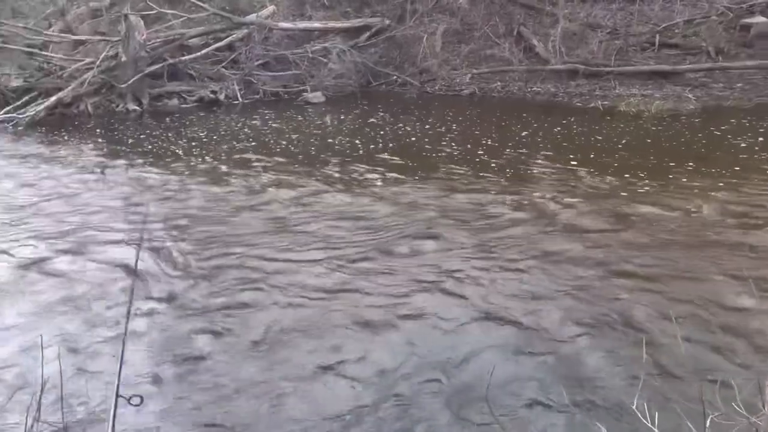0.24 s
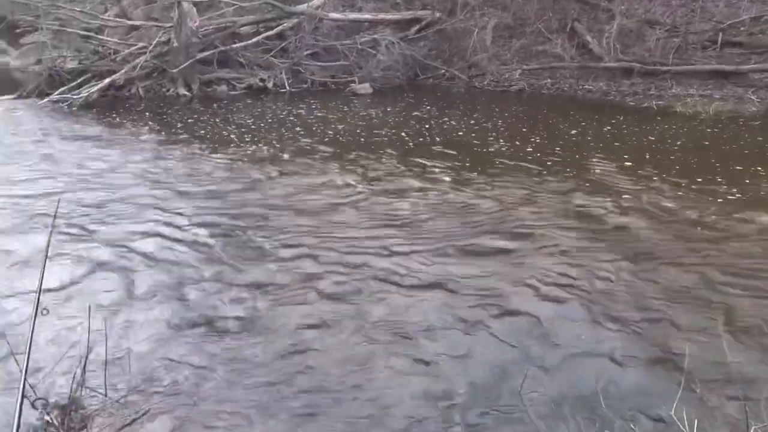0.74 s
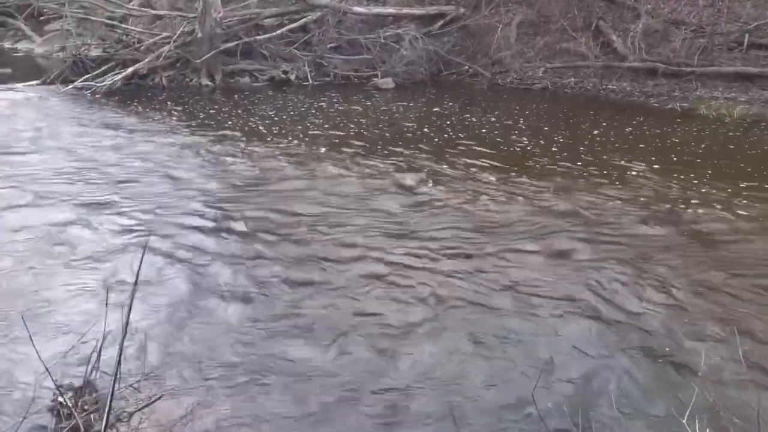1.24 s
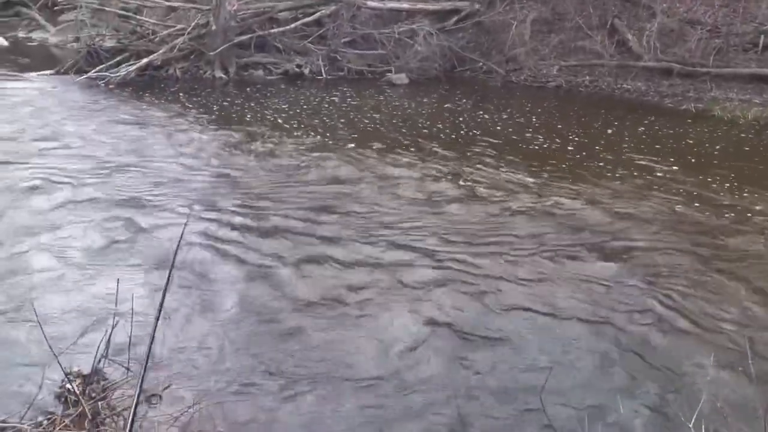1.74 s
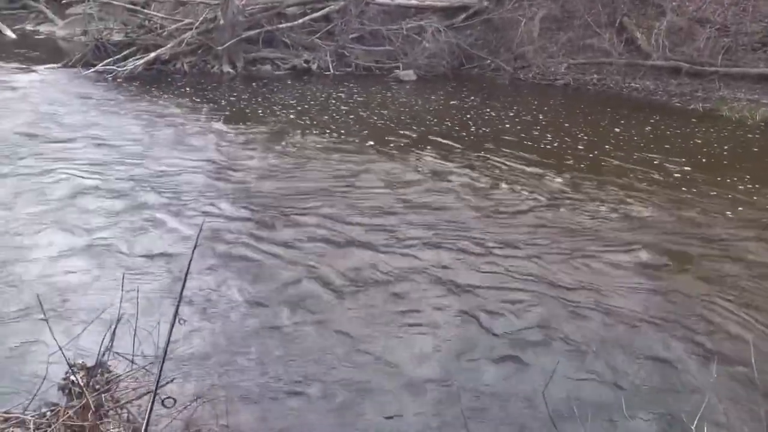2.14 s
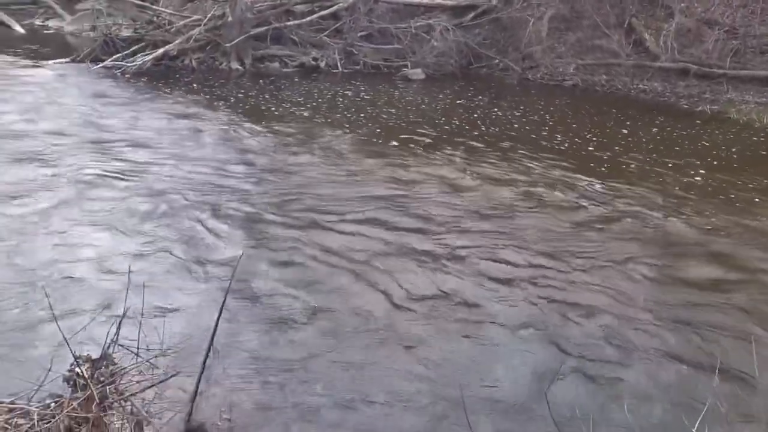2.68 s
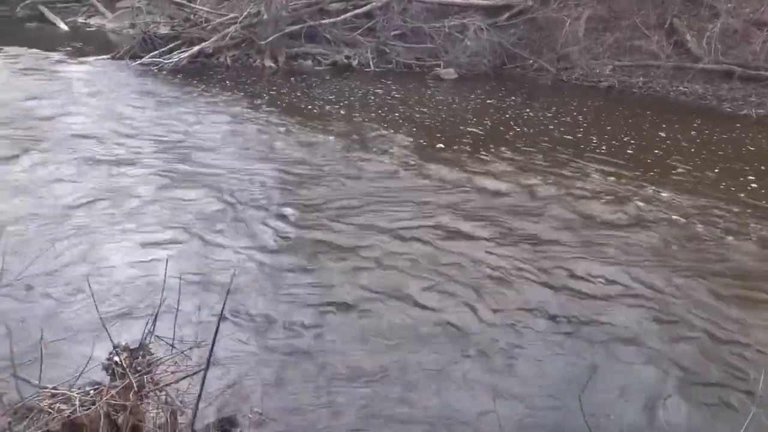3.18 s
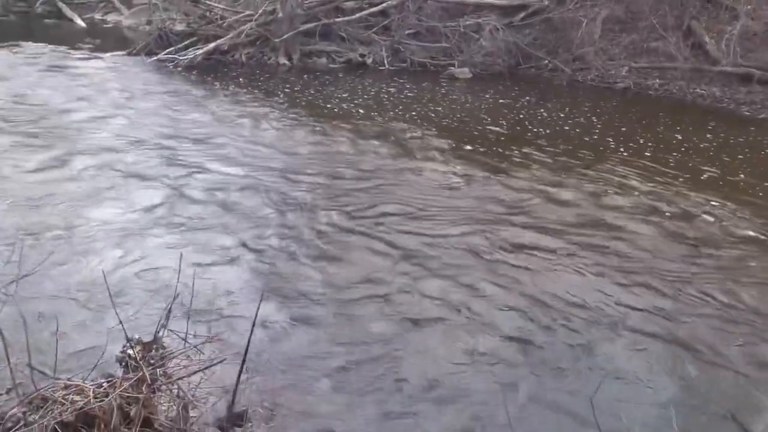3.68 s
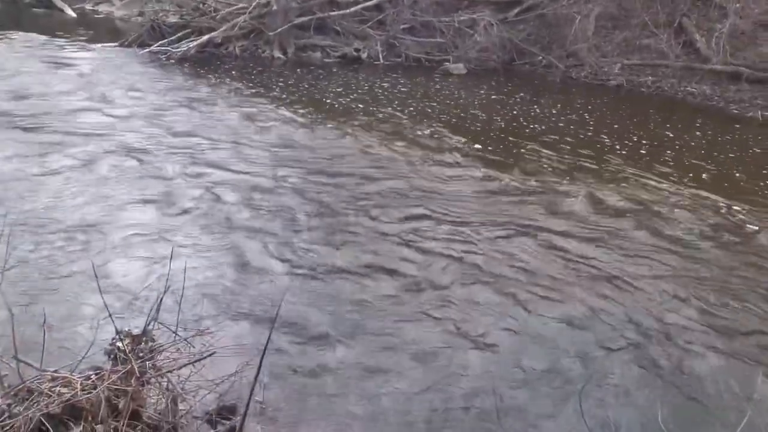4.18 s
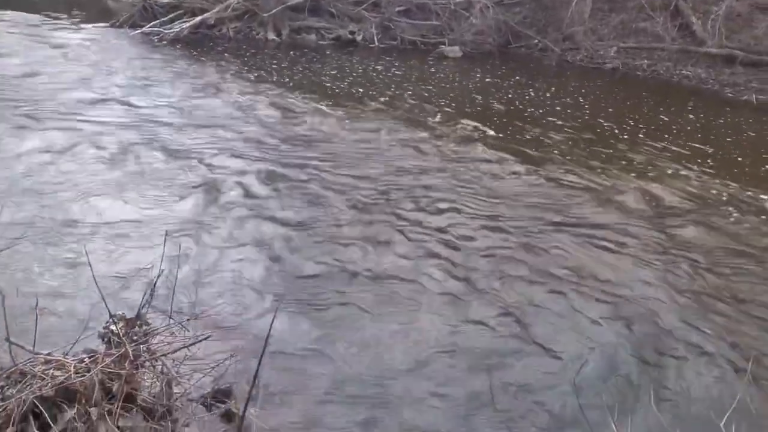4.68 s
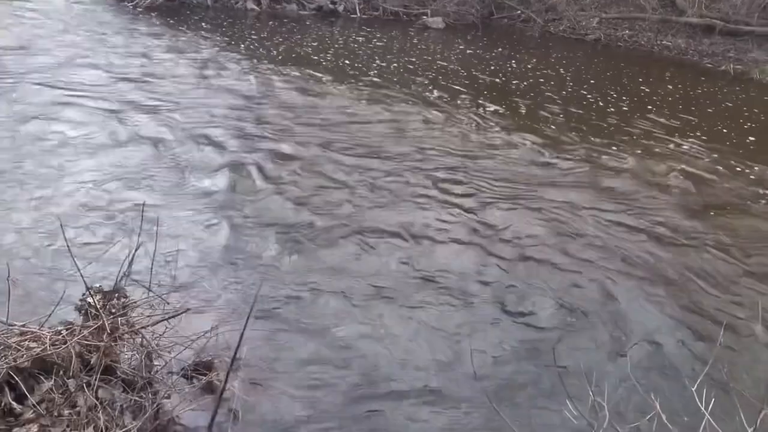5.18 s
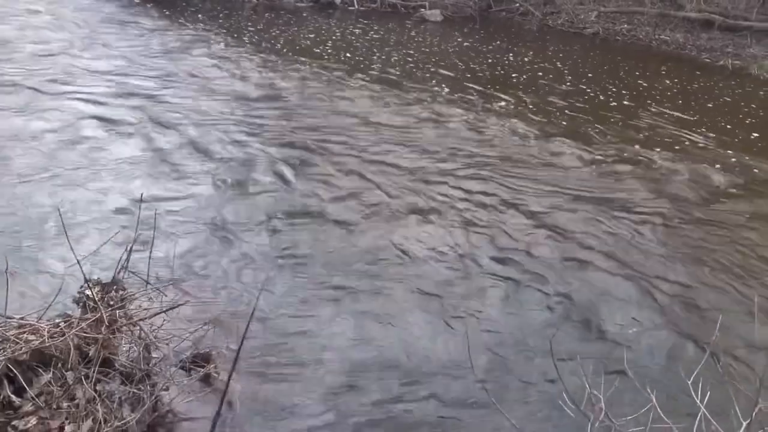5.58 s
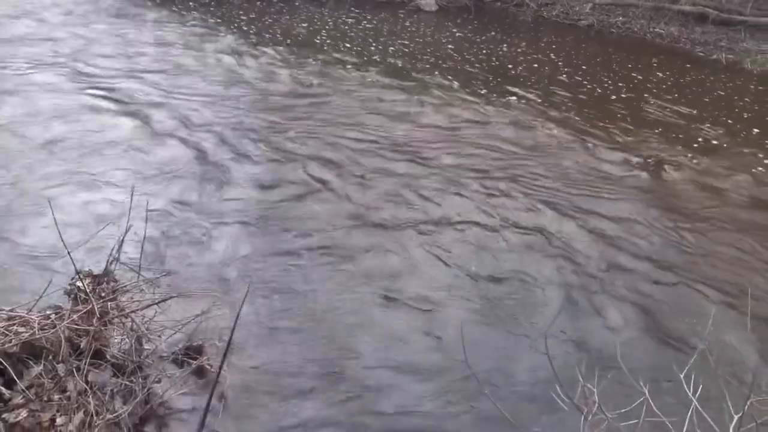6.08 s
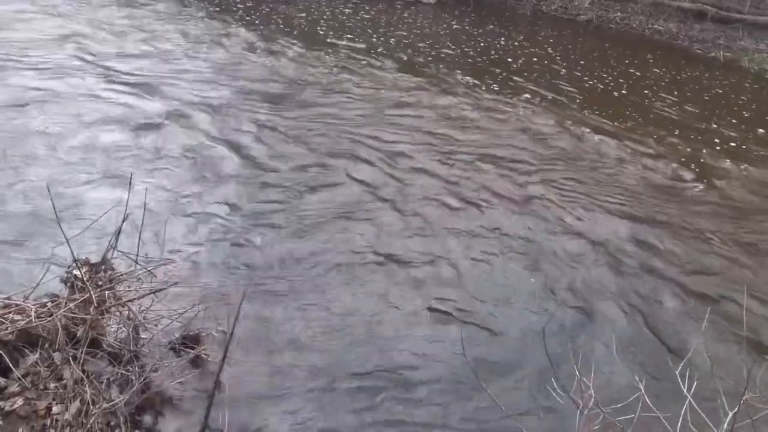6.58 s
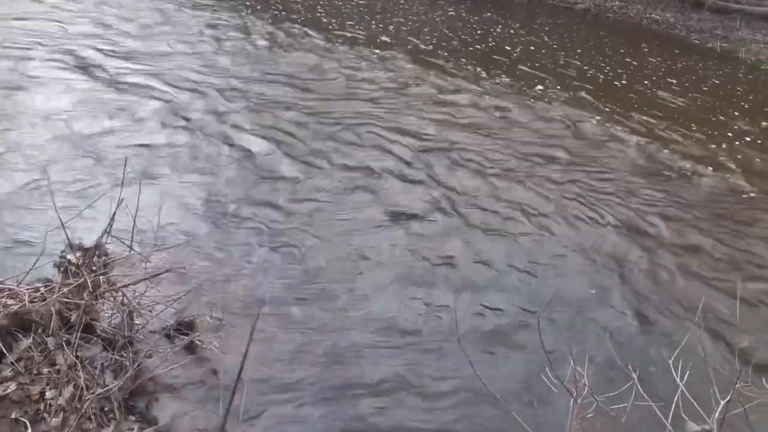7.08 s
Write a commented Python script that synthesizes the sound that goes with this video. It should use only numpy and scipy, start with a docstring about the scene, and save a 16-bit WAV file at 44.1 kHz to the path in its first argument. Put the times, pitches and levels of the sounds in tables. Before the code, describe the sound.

A shallow stream rushes steadily over a riffle outdoors, with small bubbly plops close to the bank. Right at the start, the plastic case of a hand-held camera clicks sharply once and rustles briefly under the fingers. Wind buffets the microphone in low, uneven gusts throughout, while the water keeps flowing at an even level and a few soft handling ticks come and go.

```python
"""A flickering rush of water is heard first: a shallow stream on a riffle, with a few nearer plops.
Each air bubble rings as a damped oscillator; countless ones merge into noise, coloured by the
resonances of a small hand-held camera on the bank. Wind eddies buffet its microphone ports and its
electronics whine faintly. Its plastic case clicks once, rustles under the fingers and ticks softly."""
import sys
import numpy as np
from scipy import signal
from scipy.fft import rfft, irfft
from scipy.io import wavfile
from scipy.ndimage import uniform_filter1d

SR = 44100
rng = np.random.default_rng(int(sys.argv[2]) if len(sys.argv) > 2 else 0)


def generate_wav(signal):
    """Clip the signal to [-1, 1] and save it as 16-bit WAV at the path in sys.argv[1]."""
    frames = np.transpose(np.atleast_2d(signal))
    scaled = np.clip(frames, -1, 1) * 32767
    pcm = np.round(scaled).astype(np.int16)
    wavfile.write(sys.argv[1], SR, pcm)


N = 323253
TIME, FREQ = np.arange(N) / SR, np.fft.rfftfreq(N, 1 / SR)

# spectrum of the rushing water: f/Hz, relative level/dB
WATER_SPECTRUM = [(60, -5), (118, -6.5), (150, 2.5), (210, 0), (270, -5.5), (450, -9), (680, -12.5),
                  (1300, -7.5), (1750, -7.5), (2330, -15), (3600, -17.5), (4250, -19), (4600, -17),
                  (5500, -15), (6300, -22.5), (7850, -26.5), (8150, -35), (9000, -41.5), (11500, -49.5),
                  (13500, -62.5)]
# resonances of the microphone housing: f/Hz, width/Hz, lift/dB
HOUSING_MODES = [(960.3, 130, 12), (1200, 30, 7), (1319, 72, 7), (1464, 137, 5), (1620, 103, 6),
                 (2083, 73, 7), (2710, 270, 8.5), (2960, 120, 3), (3130, 200, 5.5), (4620, 200, 2),
                 (6780, 500, 4.5)]
# the two microphone ports: f/Hz, coherence (0-1), left minus right/dB
PORT_RESPONSE = [(101, 0.8, 0), (292, 0.57, -5.5), (670, 0.42, -2.5), (970, 0.9, 5), (1130, 0.43, 2),
                 (1340, 0.93, 4.5), (2320, 0.51, 0.5), (2750, 0.4, 3.5), (3300, 0.52, -0.5),
                 (4340, 0.9, -0.5), (5300, 1, -4), (8000, 0.98, 3.5)]
# phase lag of the left port: f/Hz, lag/rad
PORT_PHASE = [(250, 0.11), (900, 0.097), (1150, 0.53), (1800, 0.63), (2500, 0.93), (3800, 0.067),
              (4400, 0.023)]
# strength of the flow in the middle band: t/s, gain/dB
FLOW_GAIN = [(0, -57), (1.3, -58.5), (3.3, -57), (3.8, -58), (5.2, -58.5), (7.33, -57.5)]
# the water's deep churn: t/s, gain/dB
CHURN_GAIN = [(0, -58), (.55, -54), (1.0, -58), (2.9, -56), (3.35, -55), (3.9, -57), (4.5, -56), (5.8, -57),
              (6.25, -54), (6.8, -57)]
# peaks of short surges in the churn: t/s, gain/dB, length/s
CHURN_SURGES = [(.29, -51, 0.038), (1.44, -50.5, 0.051), (3.29, -50.5, .09), (3.55, -51, 0.033),
                (5.26, -54, 0.087)]
# spectrum of the wind's rumble: f/Hz, relative level/dB
WIND_SPECTRUM = [(10, -5), (19, 4.5), (29, 4.5), (36, 1), (48, -19.5), (65, -33.5), (100, -40), (200, -79),
                 (1000, -110)]
# the breeze between gusts: t/s, level/dB
BREEZE_LEVEL = [(0, -42), (.5, -39), (.95, -42.5), (1.25, -48), (1.7, -42.5), (2.05, -51), (2.35, -42),
                (3.15, -46), (3.6, -50.5), (4.45, -43.5), (5.3, -44), (6.35, -43), (6.95, -46),
                (7.06, -56.5), (7.15, -44.5), (7.3, -49.5)]
# peaks of gusts on the microphone: t/s, level/dB, length/s, burble level/dB
WIND_GUSTS = [(.2, -36, 0.15, -66), (0.326, -29.5, 0.069, -53), (0.563, -36.5, 0.069, -64),
              (0.647, -34, 0.06, -67), (0.777, -31.5, 0.057, -56), (1.076, -29.5, 0.042, -56),
              (1.497, -36, 0.031, -70), (1.654, -36.5, 0.035, -72), (2.526, -34.5, 0.081, -61),
              (2.913, -38.5, 0.14, -74), (3.3, -36, 0.045, -66), (3.38, -39, 0.093, -58),
              (3.77, -36, 0.046, -56), (3.855, -36.5, 0.027, -66), (4.06, -44, 0.029, -52.5),
              (4.294, -48, 0.028, -61.5), (4.559, -35.5, 0.037, -61), (5.074, -44.5, 0.14, -57),
              (5.637, -36, 0.11, -55.5), (5.8, -42, 0.17, -67), (6.339, -32, 0.044, -58),
              (6.49, -52, 0.086, -57.5), (6.872, -37, 0.079, -59.5)]
# resonances of the camera's whine: f/Hz, width/Hz, relative level/dB
WHINE_MODES = [(5990, 87, -4), (5450, 1200, -9.5)]
# clicks of hard plastic: t/s, level/dB, rise/s, decay/s, tilt/(dB per octave),
# touched spot's f/Hz, its lift/dB, treble cut-off/Hz
CASE_CLICKS = [(0.0356, -43, 0.00056, 0.00093, 8, 6770, 17.5, 7400),
               (0.0467, -30.5, 0.0029, 0.0044, -2.5, 3000, 3, 13000),
               (.061, -49.5, 0.0055, 0.01, 0, 2930, 1, 13000), (.085, -57, .003, 0.004, 2, 7800, 8, 8500),
               (0.107, -56, 0.0015, 0.0016, -2, 3150, 10, 5000),
               (.109, -50, .001, 0.0018, 6, 5550, 9, 6300), (.124, -61, .001, .002, 3, 7800, 11, 8200),
               (0.1455, -56, .001, .002, 4, 5200, 6, 7500),
               (0.4863, -53.5, 0.002, 0.0032, 9, 7400, -3, 10100),
               (0.49, -53.5, .0015, 0.0051, -5, 2050, 11, 5000),
               (2.042, -59.5, .002, 0.0044, 1, 7400, 13, 8000),
               (2.997, -52, .001, 0.002, 4, 4900, 16, 6800), (5.361, -61, .002, 0.004, 9, 6830, 15, 8500),
               (6.599, -62, .001, .002, 7, 7700, 21, 9000)]
# modes of the clicked plastic: f/Hz, width/Hz, relative level/dB
PLASTIC_MODES = [(2060, 70, -1), (2660, 90, -3), (2890, 130, 3), (3435, 70, -1), (3900, 90, -6),
                 (4110, 70, 2), (4660, 70, 1), (5160, 60, 0), (5465, 70, -2), (6300, 120, -10),
                 (6720, 150, -10), (7500, 120, -10), (7820, 110, -5), (9130, 150, -8)]
# spectrum of the dry crack under the modes: f/Hz, relative level/dB
CRACK_SPECTRUM = [(900, -10), (2250, -19), (2850, 0), (5300, 0.5), (7900, -6), (8500, -15), (9300, -20),
                  (10200, -22), (13500, -25)]
# modes of the rubbed case: f/Hz, width/Hz, relative level/dB
RUB_MODES = [(2940, 380, -2.5), (4560, 520, 1), (5450, 600, -6), (6860, 900, -3.5)]
# nearer bubbles: t/s, level/dB, f/Hz, decay/cycles
NEAR_BUBBLES = [(.259, -47.5, 990, 10), (.383, -52, 975, 7.2), (.445, -53, 970, 5), (.46, -49, 954, 8),
                (.524, -50, 950, 11), (.765, -50, 970, 8.9), (1.031, -43.5, 1660, 5.7),
                (1.19, -47, 980, 4.6), (1.336, -54, 1320, 11), (1.389, -49, 960, 4.2),
                (2.035, -56, 1180, 17), (2.04, -53, 1630, 12), (2.11, -50, 1300, 10),
                (2.363, -51.5, 977, 12), (2.606, -51, 950, 5), (2.742, -46, 944, 10), (2.976, -47, 980, 10),
                (3.134, -48, 995, 8.9), (3.365, -50, 977, 12), (3.424, -47, 1650, 7),
                (3.449, -48.5, 955, 6), (3.449, -47, 1650, 5), (3.945, -48.5, 1200, 6),
                (4.134, -52.5, 717, 5), (4.249, -48, 970, 6.3), (4.326, -49, 961, 6),
                (4.654, -49, 905, 4.6), (4.924, -47, 950, 6.4), (5.235, -51, 965, 6.2),
                (5.305, -52.5, 1560, 15), (5.355, -54, 1010, 6.2), (5.378, -48, 1420, 10),
                (5.451, -46, 966, 4.4), (5.6165, -47, 970, 7), (5.822, -49, 1500, 6),
                (5.945, -50, 915, 9.4), (6.235, -50.5, 975, 9), (6.662, -51, 1330, 4.6),
                (7.09, -51, 997, 9.2), (7.111, -47.5, 1600, 11)]

LEFT_RIGHT = np.array([[1], [-1]])  # opposite signs at the two ports


def undb(db):
    """Amplitude grows tenfold for every 20 dB."""
    return 10 ** (np.asarray(db) / 20)


def unit(x):
    """Normalisation to rms 1."""
    return x / np.sqrt(np.mean(x ** 2))


def over_time(rows):
    """Linear interpolation of (t/s, value) rows."""
    return np.interp(TIME, *np.transpose(rows))


def over_hz(rows, hz=FREQ, column=1):
    """Interpolation of one column on a log-frequency axis."""
    rows = np.array(rows)
    return np.interp(np.log(hz + 1), np.log(rows[:, 0]), rows[:, column])


def shape(x, gain):
    """Filtering multiplies the spectrum by a gain."""
    return irfft(rfft(x) * gain, N)


def noise(gain):
    """White noise takes on the spectrum of its filter."""
    return shape(rng.standard_normal(N), gain)


def wander(rate_hz):
    """Low-passed noise fluctuates smoothly, with rms 1."""
    return unit(noise(np.exp(-(FREQ / rate_hz) ** 2) * (FREQ > 0)))


def swells(rows):
    """Bell-shaped swells (t/s, level/dB, length/s) add in power."""
    return sum(undb(db) ** 2 * np.exp(-(2 * (TIME - s) / length) ** 2) for s, db, length in rows)


def resonate(modes, hz):
    """The complex responses of damped modes (f/Hz, width/Hz, level/dB) add."""
    return sum(undb(db) / (1 + 2j * (hz - f) / width) for f, width, db in modes)


def add(out, s, sound):
    """Superposition of a short sound, starting at s seconds."""
    start = int(np.clip(s * SR, 0, N - 1))
    out[start:start + len(sound)] += sound[:N - start]


def bubble(hz, cycles, glide):
    """An air pocket rings as a damped oscillator, rising in pitch as it nears the surface."""
    age = np.arange(int(5 * cycles * SR / hz) + 2) * hz / SR / cycles  # in decay times
    phase = 2 * np.pi * cycles * (age + glide * age ** 2 / 10)
    return np.sin(phase) * np.exp(-age) * (1 - np.exp(-8 * age))


def babble(count, spread_db, cycles, low_hz, high_hz):
    """Independent bubbles ring at random moments, many faintly and a few loudly."""
    out = np.zeros(N)
    for when, pitch, faintness, ring in rng.random((count, 4)):
        hz = low_hz * (high_hz / low_hz) ** pitch
        gain = undb(-spread_db * np.log(faintness + 0.017))
        add(out, when * N / SR, gain * bubble(hz, cycles * (.5 + ring), glide=0.2))
    return unit(out)


def froth(flicker_db, surge_db):
    """Far bubbles sum incoherently to noise; each half octave flickers, the treble least."""
    out, surge = 0, wander(10.7)
    edges = np.r_[0, 120 * 2 ** np.arange(0, 6.5, .5), SR]
    for low, high in zip(edges, edges[1:]):
        band = noise((FREQ >= low) & (FREQ < high))
        swing_db = flicker_db * wander(25) + surge_db * surge
        out = out + band * undb(swing_db / (1 + (low / 3500) ** 2))
    return unit(out)


def ports(direct, diffuse):
    """Direct sound reaches the two ports with a phase lag; diffuse sound lowers their coherence."""
    coherence = np.clip(over_hz(PORT_RESPONSE), 0, 1)
    lean = undb(over_hz(PORT_RESPONSE, column=2) / 2) * np.exp(-.5j * over_hz(PORT_PHASE))
    mid = shape(direct, np.sqrt((1 + coherence) / 2))
    side = shape(diffuse, np.sqrt((1 - coherence) / 2))
    return np.array([shape(mid + side, lean), shape(mid - side, 1 / lean)])


def riffle(churn_swing_db=1.03, spray_db=-57):
    """Bubble noise is filtered by the housing's resonances and swells with the flow."""
    housing_db = sum(db / (1 + (2 * (FREQ - hz) / width) ** 2) for hz, width, db in HOUSING_MODES)
    colour = undb(over_hz(WATER_SPECTRUM) + housing_db)
    bubbles = babble(count=3600, spread_db=3.5, cycles=6.15, low_hz=656, high_hz=3200)
    direct = shape(froth(flicker_db=1.55, surge_db=.5) + undb(-17) * bubbles, colour)
    water = ports(unit(direct), diffuse=unit(noise(colour)))
    # the deep churn and the middle band swell separately; the fine spray hisses evenly
    low = shape(water, 1 / (1 + (FREQ / 330) ** 4))
    spray = shape(water, 1 - 1 / (1 + (FREQ / 3600) ** 6))
    middle = water - low - spray
    churn = undb(over_time(CHURN_GAIN) + churn_swing_db * wander(5.6))
    low_gain = np.sqrt(churn ** 2 + swells(CHURN_SURGES))
    return low * low_gain + middle * undb(over_time(FLOW_GAIN)) + spray * undb(spray_db)


def steady(x):
    """Division by its smoothed envelope holds a low noise near rms 1."""
    return x / np.sqrt(uniform_filter1d(np.abs(signal.hilbert(x)) ** 2, size=4400) / 2)


def wind(flutter_db=3.5, swirl_db=-27, burble_hz=57.4, burble_width_hz=34):
    """Turbulent pressure heaves both ports nearly alike; small eddies shed in the gusts burble."""
    rumble = undb(over_hz(WIND_SPECTRUM))
    eddies, swirl = noise(rumble), noise(rumble)
    burble = noise(np.exp(-((FREQ - burble_hz) / burble_width_hz) ** 2))
    heave = steady(eddies) + undb(swirl_db) * unit(swirl) * LEFT_RIGHT
    breeze = undb(over_time(BREEZE_LEVEL) + flutter_db * wander(21))
    gust_power = swells(row[:3] for row in WIND_GUSTS)
    burble_power = swells((s, db, length) for s, _, length, db in WIND_GUSTS)
    return heave * np.sqrt(breeze ** 2 + gust_power) + steady(burble) * np.sqrt(burble_power)


def whine(pulse_hz=59.94, level_db=-77):
    """Periodic pulses in the camera's electronics excite a narrow and a broad resonance."""
    pulses = np.diff(np.floor(TIME * pulse_hz), prepend=0)
    response = resonate(WHINE_MODES, FREQ) * np.exp(-((FREQ - 5500) / 1300) ** 4)
    return undb(level_db) * unit(shape(pulses, response))


def clicks(snap_db=-3, scrape_db=-5, spot_width_hz=560):
    """Stick-slip in plastic: a dry scrape peaks in a snap that rings the modes of the touched spot."""
    out, length, lead_s = np.zeros((2, N)), 8192, .03
    hz, t = np.fft.rfftfreq(length, 1 / SR), np.arange(length) / SR
    ring = resonate(PLASTIC_MODES, hz) * hz ** 8 / (hz ** 8 + 1800 ** 8) / (1 + (hz / 8600) ** 20)
    crack = undb(-14) * undb(over_hz(CRACK_SPECTRUM, hz)) + undb(-12) * np.abs(ring)
    delay = np.exp(-2j * np.pi * hz * lead_s)  # puts the snap at the scrape's peak
    for s, db, rise, decay, tilt, spot_hz, spot_db, top_hz in CASE_CLICKS:
        push = np.exp(np.minimum((t - lead_s) / rise, (lead_s - t) / decay))
        lift_db = spot_db / (1 + (2 * (hz - spot_hz) / spot_width_hz) ** 2)
        tilt_db = tilt * np.log2(np.clip(hz, 2000, 8000) / 4000)
        spot = undb(lift_db + tilt_db) / (1 + (hz / top_hz) ** 12)
        spot_ring, spot_crack = (x / np.sqrt(np.mean(np.abs(x) ** 2))
                                 for x in (spot * ring, spot * crack))
        snap = undb(snap_db) * np.linalg.norm(push) * delay * spot_ring
        shared, left, right = rng.standard_normal((3, length))
        # the case carries the scrape to each port by a slightly different path
        for port, own in zip(out, (left, right)):
            scrape = undb(scrape_db) * rfft(push * (shared + undb(-8) * own)) * spot_crack
            add(port, s - lead_s, undb(db) * irfft(snap + scrape))
    return out * undb(-0.9 * LEFT_RIGHT)


def rustle(level_db=-68, grain_db=4.5):
    """Friction of settling fingers: tiny uneven slips faintly excite the modes of the case."""
    grip = np.exp(-((TIME - .23) / 0.15) ** 2) * undb(2 * wander(30))
    slips = rng.standard_normal(N) * undb(grain_db * wander(400))
    response = sum(np.abs(resonate([mode], FREQ)) ** 2 for mode in RUB_MODES)
    rub = shape(slips, response / (1 + (FREQ / 7900) ** 20))
    return undb(level_db) * grip * unit(rub)


def plops():
    """Larger bubbles near the bank, a little to the left, ring at their natural frequencies."""
    out = np.zeros(N)
    for s, db, hz, cycles in NEAR_BUBBLES:
        add(out, s, undb(db) * bubble(hz, cycles, glide=0.021))
    return out * undb(2.3 * LEFT_RIGHT)


def scene():
    """Pressures superpose: water in stereo, wind and camera sounds near the middle."""
    return riffle() + plops() + wind() + clicks() + rustle() + whine()


def record(dry):
    """The camera's low-pass filter cuts the treble above 13.5 kHz."""
    return signal.sosfilt(signal.ellip(8, .2, 70, 13500, fs=SR, output="sos"), dry)


dry = scene()
out = record(dry)
generate_wav(out)
```